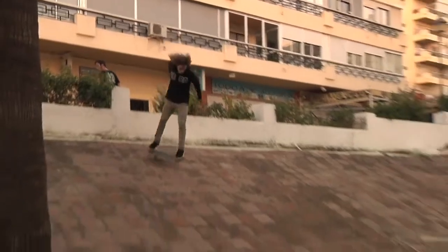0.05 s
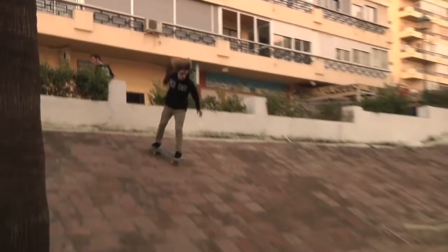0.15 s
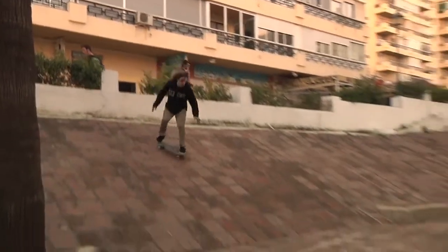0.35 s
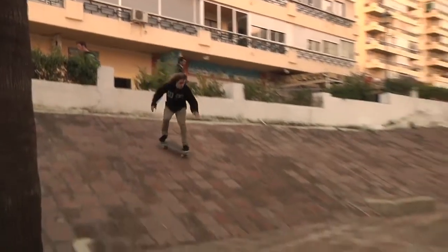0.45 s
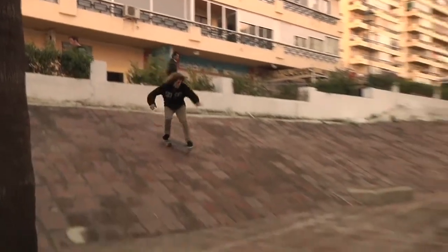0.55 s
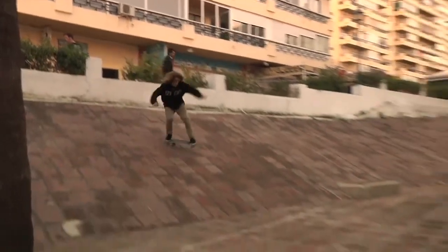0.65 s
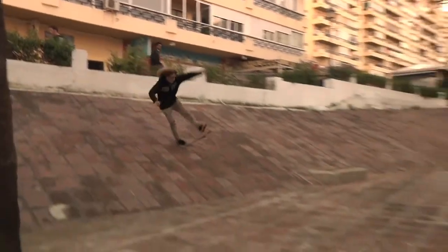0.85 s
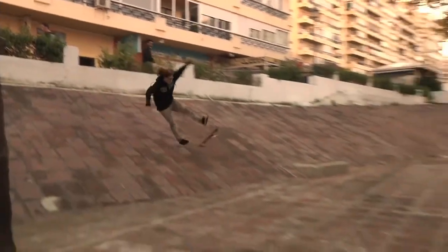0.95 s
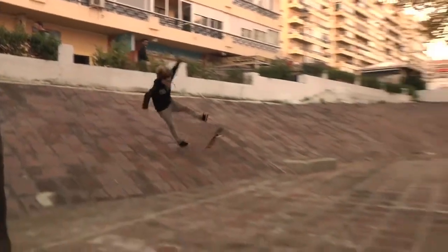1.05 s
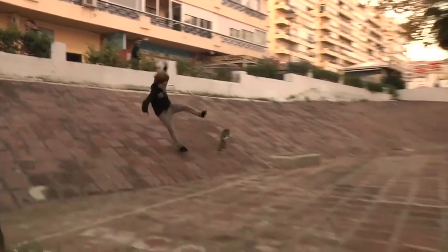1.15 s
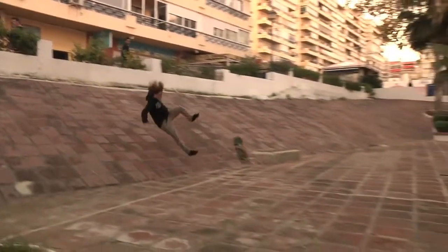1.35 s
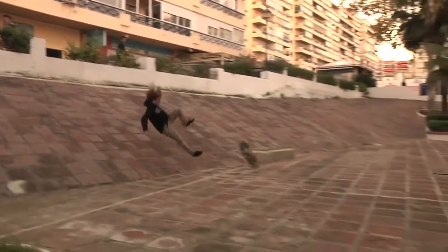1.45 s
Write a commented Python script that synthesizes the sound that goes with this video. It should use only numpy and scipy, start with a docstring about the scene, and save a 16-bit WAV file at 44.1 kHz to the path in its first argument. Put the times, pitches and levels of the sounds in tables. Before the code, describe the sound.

Skateboard landing hard outdoors, rumbling over brick, then skidding out with a sharp clatter.

```python
"""A brick bank between apartment fronts. A skateboard slams down and rolls across it, wheels
knocking over the joints and crunching grit; the contacts ring deck, trucks and wheels.
The board skids out from under the rider, clatters, strikes the bricks with its tip and flies off.
Shoes stumble on. The fronts throw back a long, dull echo; traffic rumbles far away."""
import sys
import numpy as np
from scipy import signal
from scipy.fft import rfft, irfft
from scipy.io import wavfile
from scipy.ndimage import uniform_filter1d

SR = 44100
rng = np.random.default_rng(int(sys.argv[2]) if len(sys.argv) > 2 else 0)


def bounce(signal):
    """Save signal as a 16-bit WAV file at the path given by the first command-line argument."""
    frames = np.transpose(np.atleast_2d(signal))
    limited = np.clip(frames, -1, 1)
    pcm = np.round(limited * 32767).astype(np.int16)
    wavfile.write(sys.argv[1], SR, pcm)


N = 66150
T = np.arange(N) / SR
TAPS = 2048

# distant traffic spectrum: freq_hz, level_db
TRAFFIC_SPECTRUM = [(15, -27.5), (25, -1), (81, -16.5), (703, -22.5), (1020, -32.5), (3060, -48),
                    (8800, -53), (11400, -72)]
# low rumble under the ride, the fall and the stumbling steps: time_s, level_db
RUMBLE_ENVELOPE = [(.24, -57), (.285, -29), (.39, -29), (.5, -34), (.63, -29.5), (.71, -33.5), (.86, -33),
                   (.925, -25), (1.0, -30), (1.08, -39), (1.5, -40.5)]
# rumble spectrum: freq_hz, level_db
RUMBLE_SPECTRUM = [(20, -20), (40, 0), (62, 4), (88, 10), (120, 7.5), (160, -11), (300, -32), (2000, -110)]
# deck, truck and wheel resonances: loaded_hz, loaded_db, free_hz, free_db, width_hz
BOARD_MODES = [(214.4, -1.5, 205, -3, 47), (285, 0, 275, -2, 60), (405, -6.5, 420, -5.5, 105),
               (566, -12, 550, -7, 115), (784, -10, 860, -8, 125), (944, -12.5, 1000, -11, 100),
               (1236, -19, 1290, -10, 140), (1460, -17, 1620, -15, 166), (2150, -30.5, 2100, -29, 250),
               (2516, -30, 2440, -26.5, 140), (2850, -29, 2850, -29, 146), (3870, -33, 3960, -33, 290),
               (6360, -51.5, 6300, -50.5, 190)]
# grit crunch spectrum: freq_hz, level_db
CRUNCH_SPECTRUM = [(100, -9.5), (400, -1.5), (1300, 1), (1900, -7), (2900, -9), (3500, -20), (4050, -16.5),
                   (5700, -34), (6350, -29), (9500, -51)]
# roughness of the ride: time_s, level_db
ROLL_ENVELOPE = [(.245, -60.5), (.262, -18.5), (.39, -25), (.44, -30), (.58, -32), (.635, -25),
                 (.675, -28.5), (.75, -34), (.775, -28), (.815, -25.5), (.868, -41), (.895, -20),
                 (.95, -21), (1.03, -23.5), (1.09, -40.5)]
# board hits brick: start_s, clatter_db, crunch_db, chatter_s, pitch_hz, note_db
BOARD_HITS = [(0.2474, -22, -23, .005, 1000, -15), (0.2533, -17.5, -16.5, .007, 765, -.5),
              (.2680, -24, -27, 0.018, 265, -14.5), (0.2919, -20, -25.5, 0.011, 830, -12),
              (0.2990, -20, -28, 0.0085, 740, -9), (.3040, -28, -33, .008, 280, -5),
              (.3650, -21, -26, 0.005, 900, -16), (0.3773, -30, -34.5, .008, 300, -8),
              (0.4014, -28, -26.5, 0.0092, 397, -17.5), (.4680, -33.5, -36.5, 0.0089, 303, -13),
              (.6270, -23.5, -32.5, .007, 400, -14), (.6440, -28, -28.5, 0.016, 300, -13),
              (.7650, -26.5, -33.5, 0.011, 260, -13), (.8060, -32, -34.5, .018, 230, -18),
              (.8840, -18.5, -28, 0.008, 1020, -13), (.9030, -24, -35, 0.0084, 200, -9.5),
              (.9220, -20.5, -30.5, .007, 432, -14), (0.9352, -17.5, -26, 0.007, 230, -12),
              (1.0110, -17, -23.5, .004, 1286, -2.5), (1.0405, -21, -34, .009, 900, -14)]
# street echo spectrum: freq_hz, level_db
ECHO_SPECTRUM = [(60, -14), (130, -4.5), (250, -6.5), (450, 0), (850, 1.5), (1300, -3.5), (2200, -6),
                 (4000, -2.5), (8000, -8.5)]
# street echo decay: freq_hz, t60_s
ECHO_DECAY = [(150, 1.61), (1000, 1.37)]
# rider's weight landing: start_s, level_db, pitch_hz, rise_s, t60_s
RIDER_THUDS = [(.290, -23, 40.4, 0.019, .25), (.910, -19, 92.5, .010, .10), (1.128, -24, 123, 0.0096, 0.2),
               (1.232, -29.5, 124.8, .022, .25)]
# low boom under the ride: time_s, pitch_hz, level_db
BOOM_TRACK = [(.30, 40, -33), (.355, 52, -25.5), (.39, 68.3, -25), (.46, 88.5, -27.5), (.565, 76, -33),
              (.63, 66, -32), (.72, 42, -39)]
# wavering low drone of the deck as it rolls and clatters: time_s, pitch_hz, level_db
DRONE_TRACK = [(.42, 240, -32), (.50, 220, -28), (.57, 215, -36), (.67, 245, -20.5), (.745, 208, -29),
               (.815, 222, -22), (.86, 210.4, -39), (.92, 199.8, -20.5), (.98, 207, -31)]
# wheel and sole skids: peak_s, level_db, rise_s, fall_s
SKID_EVENTS = [(0.966, -25.5, .012, .007), (.993, -24, .01, .02), (1.37, -38.5, 0.04, 0.059)]
# skid spectrum: freq_hz, level_db
SKID_SPECTRUM = [(300, -25.5), (900, -11), (1350, 1), (1750, 0.5), (2300, -5), (3500, -20), (9000, -48)]
# bending modes of the free deck: pitch_hz, level_db, t60_s
DECK_MODES = [(272, -14, .13), (530, -12, .04), (870, -15, .08), (1720, -21, .025), (2430, -25, .025)]

WEIGHT_OFF_S = .872  # board slips from under the feet
LOADED_NOTE_SEND_DB, FREE_NOTE_SEND_DB, TIP_SEND_DB = -13, -8, -3  # into the echo


def from_db(db):
    """Decibels to gain."""
    return 10 ** (np.asarray(db) / 20)


def unit_rms(x):
    """Scale to unit power."""
    return x / np.sqrt(np.mean(x ** 2) + 1e-20)


def envelope(points):
    """Gain over time from time_s, level_db points."""
    return from_db(np.interp(T, *np.transpose(points)))


def at_hz(points, hz):
    """Read a table on a log-frequency axis."""
    freq_hz, values = np.transpose(points)
    return np.interp(np.log(hz + 1e-3), np.log(freq_hz), values)


def bins_hz(size=2 * TAPS):
    """FFT bin frequencies."""
    return np.arange(size // 2 + 1) * SR / size


def colour(x, bin_db):
    """Unit-energy, minimum-phase filter of the given spectral shape."""
    cepstrum = irfft(np.log(from_db(bin_db)))
    cepstrum[1:TAPS] *= 2
    cepstrum[TAPS + 1:] = 0
    response = irfft(np.exp(rfft(cepstrum)))[:TAPS]
    return signal.fftconvolve(x, unit_rms(response) / np.sqrt(TAPS))[:N]


def noise(spectrum):
    """Steady coloured noise, unit power."""
    gain = from_db(at_hz(spectrum, bins_hz(N)))
    return unit_rms(irfft(rfft(rng.standard_normal(N)) * gain, N))


def add(track, start_s, sound):
    """Mix a sound into a track."""
    part = track[int(start_s * SR):][:len(sound)]
    part += sound[:len(part)]


def traffic(level_db=-46):
    """Steady, distant traffic."""
    return from_db(level_db) * noise(TRAFFIC_SPECTRUM)


def rumble():
    """Low rumble under the ride, the fall and the stumbling steps."""
    return envelope(RUMBLE_ENVELOPE) * noise(RUMBLE_SPECTRUM)


def grit(size=N, rate_per_s=2500, spread_db=3.5):
    """Dense tiny contacts of uneven size, unit power."""
    strength = from_db(spread_db * np.minimum(rng.exponential(1, size), 4))
    sign = rng.choice([-1, 1], size)
    contact = rng.random(size) < rate_per_s / SR
    return unit_rms(strength * sign * contact)


def board(force, tilt_db_per_oct):
    """Contacts ring the board's resonances, which shift when the weight comes off."""
    hz, out = bins_hz() + 1, 0
    loaded = [(f, db, width) for f, db, _, _, width in BOARD_MODES]
    free = [(f, db, width) for _, _, f, db, width in BOARD_MODES]
    for modes, active in ((loaded, T < WEIGHT_OFF_S), (free, T >= WEIGHT_OFF_S)):
        power = sum(from_db(db) ** 2 / (1 + ((hz - f) / width) ** 2) ** 2 for f, db, width in modes)
        out += colour(force * active, 10 * np.log10(power) + tilt_db_per_oct * np.log2(hz))
    return out


def crunch(force):
    """Grit breaks between a hard surface and the bricks."""
    return colour(force, at_hz(CRUNCH_SPECTRUM, bins_hz()))


def rolling(crunch_db=-15):
    """Hard wheels on rough brick ring the board and crush grit."""
    roughness = envelope(ROLL_ENVELOPE)
    ringing = board(grit() * roughness, tilt_db_per_oct=-.31)
    return ringing + from_db(crunch_db) * crunch(grit() * roughness)


def chatter(length_s, crack=.28):
    """Force of one blow: a crack, then a short burst of contacts."""
    burst = grit(TAPS) * np.exp(-(T[:TAPS] / length_s) ** 2)
    burst /= np.linalg.norm(burst) + 1e-9
    burst[0] += crack
    return burst * np.sqrt(SR / 100)  # about the energy of 10 ms at unit power


def ring(hz, rise_s, t60_s, size=TAPS):
    """One mode: builds during contact, then decays."""
    age_s = T[:size]
    attack = 1 - np.exp(-(age_s / rise_s) ** 2)
    decay = from_db(-60 * np.maximum(age_s - 2 * rise_s, 0) / t60_s)
    return np.sin(2 * np.pi * hz * age_s) * attack * decay


def knocks(rise_s=.0019, t60_s=.022, overtone_ratio=1.87, overtone_db=-15):
    """Each blow rattles the board, crushes grit and sounds two notes set by where the deck is hit."""
    rattle, crush, notes = np.zeros((3, N))
    for start_s, clatter_db, crunch_db, chatter_s, hz, note_db in BOARD_HITS:
        add(rattle, start_s, from_db(clatter_db) * chatter(chatter_s))
        add(crush, start_s, from_db(crunch_db) * chatter(chatter_s))
        add(notes, start_s, from_db(note_db) * ring(hz, rise_s, t60_s))
        add(notes, start_s, from_db(note_db + overtone_db) * ring(hz * overtone_ratio, rise_s, t60_s))
    return board(rattle, tilt_db_per_oct=1.5) + crunch(crush), notes


def street_echo(x, gain_db=-2.5, delay_s=.014, build_s=.017):
    """Diffuse echo off the apartment fronts, dying band by band."""
    age_s, response = np.maximum(T - delay_s, 0), 0
    edges_hz = np.geomspace(40, 10240, 17)
    for low, high in zip(edges_hz, edges_hz[1:]):
        hz = np.sqrt(low * high)
        shape = (1 - np.exp(-age_s / build_s)) * from_db(-60 * age_s / at_hz(ECHO_DECAY, hz))
        bandpass = signal.butter(2, [low, high], "band", fs=SR, output="sos")
        band = signal.sosfilt(bandpass, rng.standard_normal(N))
        response += band * from_db(at_hz(ECHO_SPECTRUM, hz)) * shape / np.linalg.norm(shape)
    return from_db(gain_db) * signal.fftconvolve(x, response)[:N]


def thuds():
    """The rider's weight comes down, one low damped tone each time."""
    out = np.zeros(N)
    for start_s, db, hz, rise_s, t60_s in RIDER_THUDS:
        add(out, start_s, from_db(db) * ring(hz, rise_s, t60_s, size=SR // 3))
    return out


def waver(corner_hz=40):
    """Random drift, unit spread."""
    return noise([(corner_hz, 0), (2 * corner_hz, -20), (10 * corner_hz, -100)])


def hum(track, pitch_spread=.08, level_spread_db=1.8):
    """Boom or deck drone: a low gliding tone, unsteady in pitch and level."""
    time_s, hz, db = np.transpose(track)
    pitch_hz = np.interp(T, time_s, hz) * (1 + pitch_spread * waver())
    phase = 2 * np.pi * np.cumsum(pitch_hz) / SR
    level_db = np.interp(T, time_s, db, left=-np.inf, right=-np.inf)
    gain = uniform_filter1d(from_db(level_db), size=600)
    return np.sqrt(2) * np.sin(phase) * gain * from_db(level_spread_db * waver())


def skids():
    """Wheels and soles rasp sideways over grit, swell and stop."""
    push = sum(from_db(db) * np.exp(-np.maximum((peak_s - T) / rise_s, (T - peak_s) / fall_s))
               for peak_s, db, rise_s, fall_s in SKID_EVENTS)
    return colour(grit() * push, at_hz(SKID_SPECTRUM, bins_hz()))


def tip_strike(start_s=1.0115, rise_s=.0012):
    """An end-on blow rings the free deck's bending modes."""
    out = np.zeros(N)
    for hz, db, t60_s in DECK_MODES:
        add(out, start_s, from_db(db) * ring(hz, rise_s, t60_s, size=N))
    return out


def scuff(start_s=1.326, level_db=-38):
    """A sole catches on the grit."""
    force = np.zeros(N)
    add(force, start_s, from_db(level_db) * chatter(length_s=.012))
    return crunch(force)


def scene():
    """Board, rider, echo and traffic; mono."""
    clatter, notes = knocks()
    contacts = clatter + rolling() + skids() + scuff()
    tip = tip_strike()
    note_send = from_db(np.where(T < WEIGHT_OFF_S, LOADED_NOTE_SEND_DB, FREE_NOTE_SEND_DB))
    echo = street_echo(contacts + note_send * notes + from_db(TIP_SEND_DB) * tip)
    lows = rumble() + thuds() + hum(BOOM_TRACK) + hum(DRONE_TRACK)
    return (contacts + notes + tip + echo + lows + traffic())[None]


def record(dry):
    """Soft peak limit, then a steep low-pass."""
    ceiling, cutoff_hz = .94, 9100
    rounded = dry / (1 + (dry / ceiling) ** 8) ** .125
    return signal.sosfilt(signal.ellip(10, .3, 70, cutoff_hz, fs=SR, output="sos"), rounded)


dry = scene()
out = record(dry)
bounce(out)
```